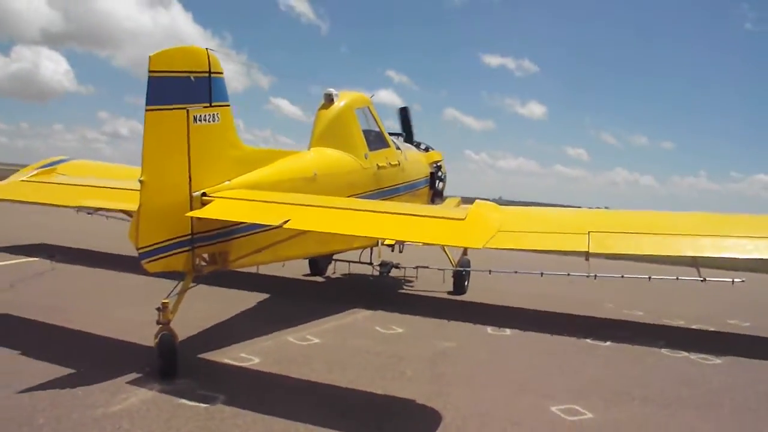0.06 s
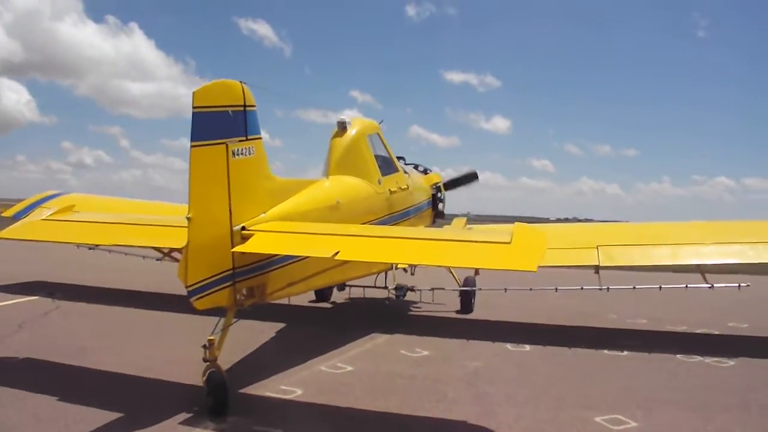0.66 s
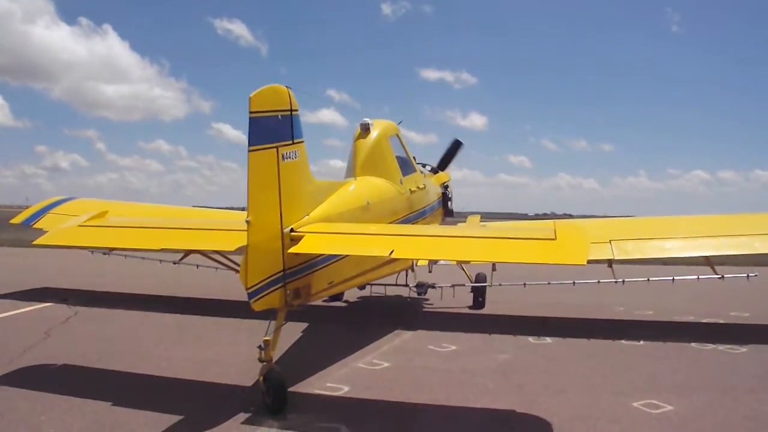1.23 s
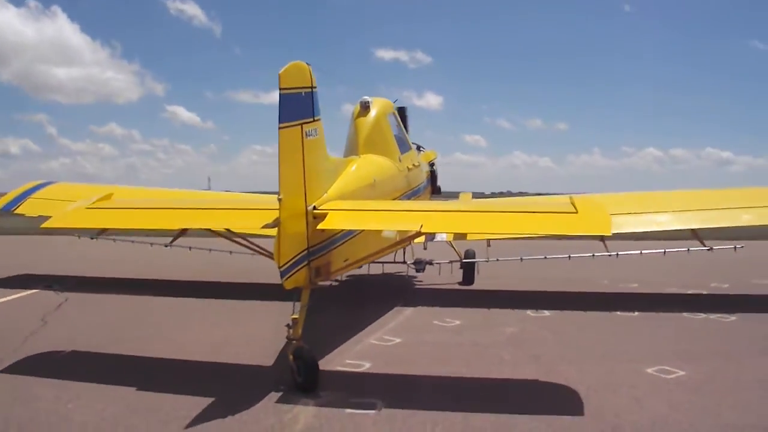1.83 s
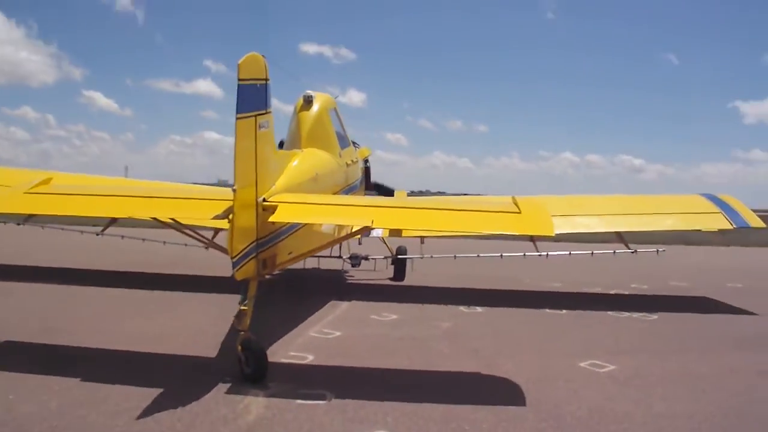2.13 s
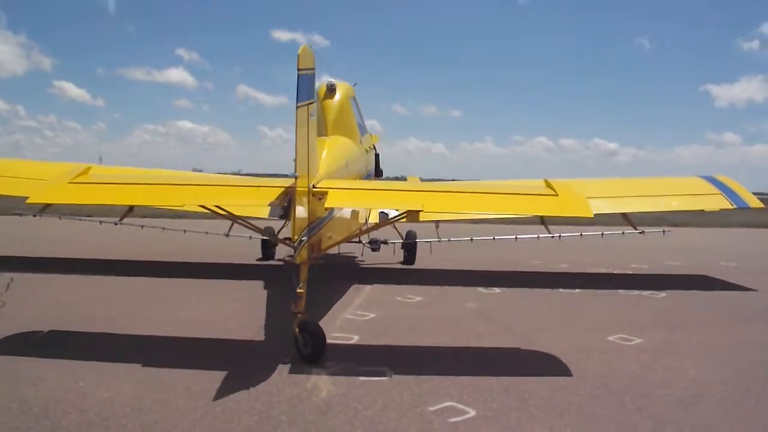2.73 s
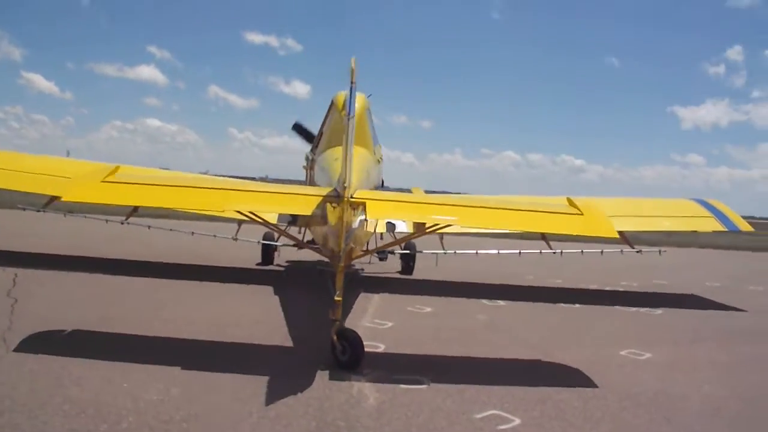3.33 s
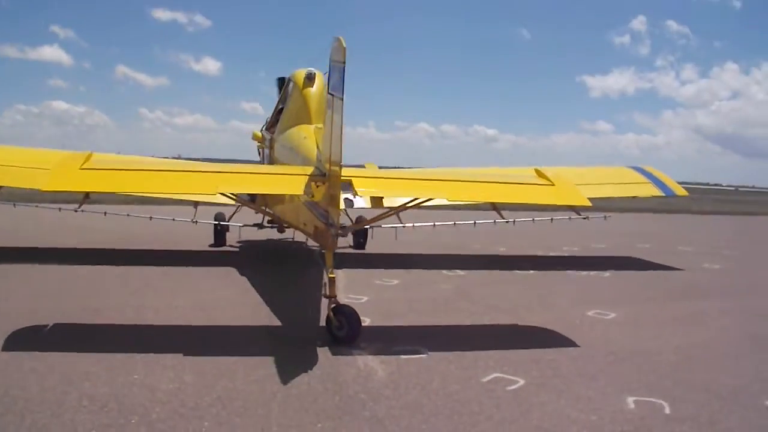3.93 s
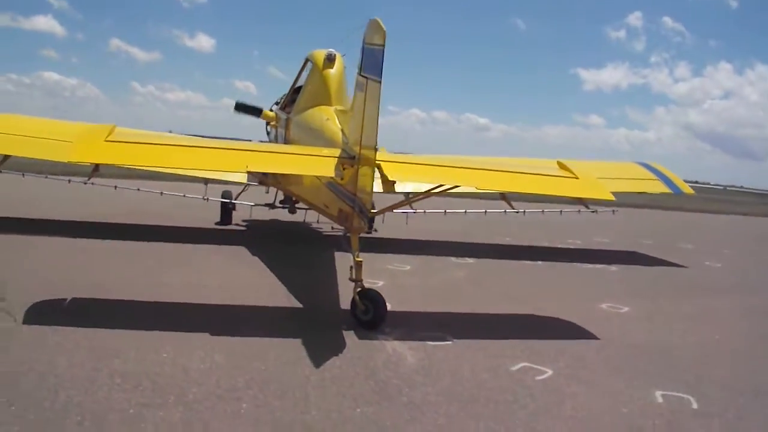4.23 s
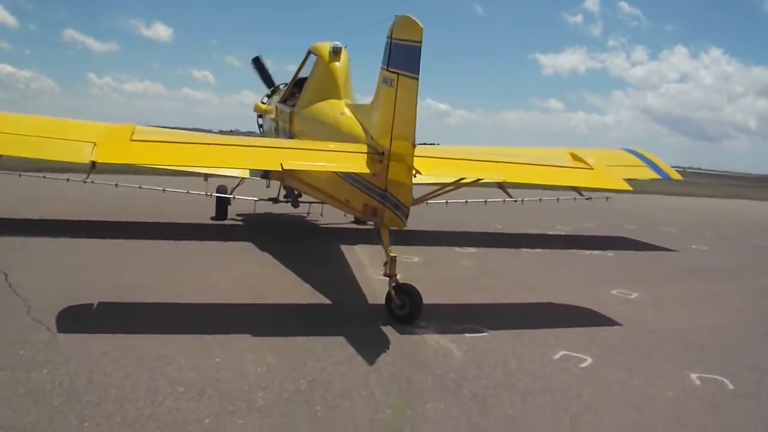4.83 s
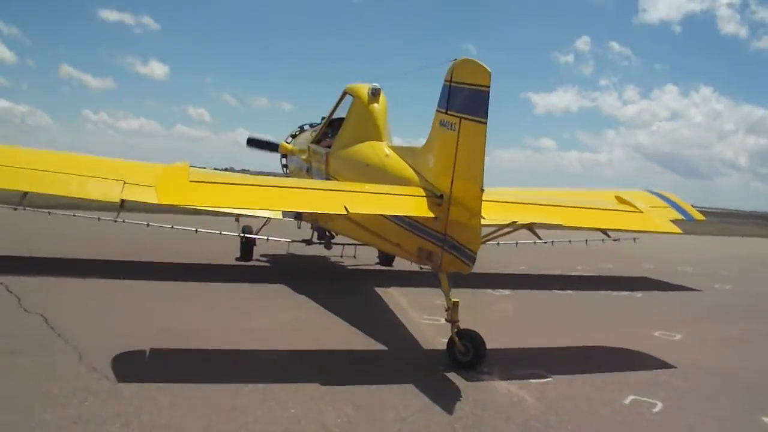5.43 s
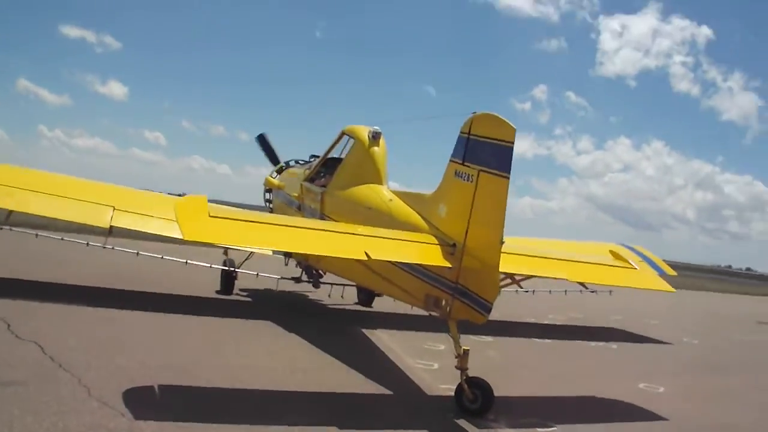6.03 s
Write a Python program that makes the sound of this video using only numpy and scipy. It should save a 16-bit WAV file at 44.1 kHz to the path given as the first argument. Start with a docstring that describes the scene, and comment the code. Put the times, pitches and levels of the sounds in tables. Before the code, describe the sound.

Gusty propeller wash buffets the microphone behind an idling piston plane, its drone and blade slap broken by two sharp wind thumps.

```python
"""A nine-cylinder radial aircraft engine idles on an open ramp, turning a two-blade propeller.
Its exhaust pulses make a drone; each passing blade slaps the air, and the blade tips hiss.
A hand-held microphone passes behind the tail, where the blades bark. The propeller's wind (its wash)
rumbles, hisses and crackles on the microphone, and two violent blasts of air overload it,
which is heard as two sharp knocks."""
import sys
import numpy as np
from scipy import signal
from scipy.fft import rfft, irfft
from scipy.io import wavfile
from scipy.ndimage import uniform_filter1d

SR = 44100
rng = np.random.default_rng(int(sys.argv[2]) if len(sys.argv) > 2 else 0)


def unload_wav(signal):
    """Save mono or channel-first audio to the path in sys.argv[1] as 16-bit WAV at rate SR, clipped to [-1, 1]."""
    wavfile.write(
        sys.argv[1],
        SR,
        np.round(np.clip(np.atleast_2d(signal).T, -1, 1) * 32767).astype(np.int16),
    )


N = 268128
TIME = np.arange(N) / SR

# Air rushing at the blade tips; the rasp and the steady hisses follow it: time_s, level_db
AIR_RUSH = [(0, -41.5), (.36, -42), (.44, -49), (.65, -44.5), (1.0, -43), (1.19, -46), (1.27, -49),
            (1.68, -55.5), (2.1, -48), (2.4, -56), (2.6, -59.5), (3.03, -53), (3.14, -46), (3.8, -46),
            (4.1, -42.5), (4.68, -52), (5.15, -41.5), (5.45, -54), (5.68, -40), (5.9, -53), (6.08, -46.5)]
# Strength of the propeller's wind on the microphone: time_s, level_db
WIND_STRENGTH = [(0, -25), (.45, -17.5), (1.0, -21.5), (1.15, -15), (1.7, -15), (1.8, -18), (2.45, -9),
                 (2.58, -23), (2.8, -17.5), (3.1, -19.5), (4.33, -29), (4.62, -17.5), (4.85, -28.5),
                 (5.3, -18), (5.55, -23.5), (5.83, -13.5), (6.08, -22.5)]


def undb(db):
    """Turn decibels into a number to multiply by."""
    return 10 ** (np.asarray(db) / 20)


def unit(x):
    """Scale a signal so that its typical swing (standard deviation) is 1."""
    return x / np.std(x)


def curve(rows):
    """Join (time_s, value) rows with straight lines, giving one value per sample."""
    return np.interp(TIME, *np.transpose(rows))


def colour(x, spectrum, size=4096):
    """Filter a sound to follow (frequency_hz, gain_db) rows."""
    hz, db = np.transpose(spectrum)
    bin_hz = np.arange(size // 2 + 1) * SR / size + 1
    log_gain = np.log(undb(np.interp(np.log(bin_hz), np.log(hz), db)))
    # folding the cepstrum makes the filter ring only after a hit, never before
    cepstrum = irfft(log_gain)[:size // 2]
    cepstrum[1:] *= 2
    ring = irfft(np.exp(rfft(cepstrum, size)))[:size // 2]
    return signal.oaconvolve(x, ring)[:N]


def noise(spectrum):
    """Noise with the given spectrum shape and a typical swing of 1."""
    return unit(colour(rng.standard_normal(N), spectrum))


def wander(rate_hz):
    """Glide to a new random value rate_hz times a second, with a typical swing of 1."""
    hold = max(int(SR / rate_hz), 2)
    steps = rng.standard_normal(N)[np.arange(N) // hold]
    return unit(uniform_filter1d(steps, hold))


def ports(x):
    """The microphone has two close openings; the left one hears a sample later."""
    return np.array([np.r_[x[0], x[:-1]], x])


def tip_hiss(offset_db=-0.5, width=0.24, grain_db=2):
    """The blade tips hiss unevenly; part of the hiss differs left and right, so it sounds wide."""
    # Tone of the hiss: frequency_hz, level_db
    spectrum = [(1500, -34), (3500, -3), (4700, 8), (5700, -4.5), (7200, -4.5), (8600, -16.5),
                (10500, -17.5), (12000, -34), (15000, -42)]
    wide_hiss = np.array([noise(spectrum), noise(spectrum)])
    level_db = curve(AIR_RUSH) + offset_db + grain_db * wander(80)
    return (ports(noise(spectrum)) + width * wide_hiss) * undb(level_db)


def crackles(boost_db=24, per_second=13, faint_db=-17, spread_db=3):
    """Wind jolts the microphone into tiny ticks; the faint ones come more often in stronger wind."""
    # The loudest jolts, before boost_db is added: time_s, level_db
    jolts = [(0.0862, -35), (0.2082, -34), (0.407, -34), (0.5285, -32.5), (0.7066, -33), (0.9592, -32),
             (1.1288, -32), (1.2177, -34), (1.3815, -35), (2.2348, -35), (3.028, -35), (3.2166, -35),
             (3.4324, -34), (4.4286, -29), (4.6555, -33), (5.2555, -30.5), (5.2908, -32.5), (5.3485, -32),
             (5.7923, -30)]
    # Tone of a tick: frequency_hz, gain_db
    spectrum = [(100, 6), (1000, 17), (3000, 10.5), (8000, -2.5), (16000, -10.5)]
    wind = undb(curve(WIND_STRENGTH)) ** 2
    at = np.flatnonzero(rng.random(N) < per_second / SR * wind / wind.mean())
    chance = rng.standard_normal((len(at), 2))
    ticks = np.zeros(N)
    ticks[at] = np.sign(chance[:, 0]) * undb(faint_db + spread_db * chance[:, 1])
    for time_s, level_db in jolts:
        ticks[int(time_s * SR)] = undb(level_db + boost_db) * rng.choice([-1, 1])
    return colour(ticks, spectrum)


def wash(flutter_db=-11, hiss_db=17.0, thump_db=4, surge_db=2.5, eddy_db=3.0,
         hiss_eddy_db=2.5, grain_db=2):
    """Big swirls of air rumble, small ones flutter, the finest hiss; gusts churn, thump and whoosh."""
    # Gusts that swell and fade: peak_s, length_s, churn_db, whoosh_db
    gusts = [(0.697, 0.037, -20, -39), (1.187, 0.031, -10, -40), (1.34, 0.036, -27, -25),
             (1.485, 0.07, -20, -26), (1.55, 0.019, -16, -33), (1.706, 0.011, -16.5, -35),
             (1.76, .03, -32, -24.5), (1.875, 0.1, -22, -28), (2.045, 0.068, -13, -26),
             (2.311, 0.089, -26, -21), (2.435, 0.034, -9.5, -17), (2.709, 0.025, -13.5, -31),
             (2.753, 0.023, -28, -26.5), (2.869, 0.034, -11, -17.5), (3.02, 0.02, -16.5, -21),
             (3.438, 0.051, -17.5, -29), (4.419, 0.027, -13.5, -41), (4.511, 0.012, -16, -37),
             (5.344, 0.051, -16.5, -49), (5.772, 0.044, -12.5, -25.5), (5.944, 0.026, -16.5, -28)]
    # Tone of each part of the wind: frequency_hz, level_db
    rumble_spectrum = [(5, -4), (14, 2), (28, -0.5), (50, -2), (80, -16.5), (130, -22), (300, -35.5),
                       (1000, -105), (8000, -130)]
    flutter_spectrum = [(30, -15.5), (100, 3), (180, -0.5), (250, -2), (400, -9), (700, -18), (1500, -34),
                        (4000, -73), (15000, -100)]
    hiss_spectrum = [(100, -5), (600, 0.5), (1000, -1.5), (1600, -4), (2200, -5.5), (2750, -2), (3250, 6),
                     (3800, -4.5), (4600, -16.5), (5700, -30.5), (7200, -42), (10500, -52), (15000, -39)]  # the microphone's opening rings near 3 kHz
    churn_spectrum = [(20, -1.5), (100, 0.5), (250, 0), (500, -8.5), (1000, -19), (2200, -29.5),
                      (3200, -20.5), (4500, -39.5), (8000, -71), (15000, -85)]
    eddies = wander(70)
    strength = undb(curve(WIND_STRENGTH))
    churning, whooshing = 0, 0
    for peak_s, length_s, churn_db, whoosh_db in gusts:
        swell = np.exp(-2 * ((TIME - peak_s) / length_s) ** 2)
        churning += swell * undb(churn_db)
        whooshing += swell * undb(whoosh_db)
    surging = strength * undb(surge_db * wander(14))
    rumble = noise(rumble_spectrum) * np.hypot(surging, churning * undb(thump_db))
    flutter = unit(noise(flutter_spectrum) * undb(eddy_db * eddies)) * strength * undb(flutter_db)
    hiss = unit(noise(hiss_spectrum) * undb(hiss_eddy_db * eddies + grain_db * wander(500)))
    hiss *= np.hypot(undb(curve(AIR_RUSH) + hiss_db), whooshing)
    return rumble + flutter + hiss + noise(churn_spectrum) * churning


def blasts(suck_s=0.006, suction=2.6, crack_s=0.002, crack_db=24, pressure=2.5, sputter_db=-1,
           edge_s=0.00046, ragged_db=4):
    """A blast sucks the microphone's diaphragm out, cracks, flings it about, then pins it, sputtering."""
    # Blasts of air: start_s, wild_s (time flung about), pinned_s (time held down), churn_db
    hits = [(2.378, .023, .021, 4), (2.772, .050, .040, 7)]
    # Tone of the churning air: frequency_hz, level_db
    spectrum = [(20, 1.5), (110, 3), (250, -5), (700, -8), (1100, -18), (2200, -25), (3200, -17.5),
                (4500, -39), (15000, -83)]
    push, churn = np.zeros(N), np.zeros(N)
    for start_s, wild_s, pinned_s, churn_db in hits:
        stages_s = start_s + np.array([-suck_s, 0, crack_s, wild_s, wild_s + pinned_s])
        suck, hit, cracked, pin, free = (SR * stages_s).astype(int)
        push[suck:hit], push[pin:free] = -suction, pressure  # the microphone's limit is about 1
        churn[hit:cracked] = undb(crack_db)
        churn[cracked:pin] = undb(churn_db)
        churn[pin:free] = undb(sputter_db)
    edge = int(edge_s * SR)
    churning = uniform_filter1d(churn, edge) * noise(spectrum) * undb(ragged_db * wander(400))
    return uniform_filter1d(push, edge) + churning


def bark(tears, level_db=-31.5, behind_s=3.81, half_crossing_s=0.55):
    """The blades bark in a narrow beam straight backwards, heard as the microphone crosses it."""
    # Tone of the bark: frequency_hz, level_db
    spectrum = [(200, -4), (520, -8), (730, 9), (950, -4), (1250, -6), (1620, 3), (1800, -4), (2000, -4),
                (2500, -12), (4000, -33), (8000, -38), (15000, -62)]
    beam = 1 / (1 + ((TIME - behind_s) / half_crossing_s) ** 6)
    return unit(colour(tears, spectrum)) * undb(level_db) * beam


def rasp(tears, boost_db=12, fade_s=0.0038, floor=0.14):
    """Torn air trails each blade as a short burst of noise over a faint steady floor."""
    # Tone of the torn air: frequency_hz, level_db
    spectrum = [(150, -17), (400, -7.5), (720, 1), (1100, -2.5), (1350, -10), (1650, -5.5), (2100, -7.5),
                (2550, -4.5), (3200, -2.5), (4500, -14), (7000, -31.5), (15000, -44)]
    trail = signal.lfilter([1], [1, -np.exp(-1 / (fade_s * SR))], tears)
    bursts = (trail + floor) * rng.standard_normal(N)
    return unit(colour(bursts, spectrum)) * undb(curve(AIR_RUSH) + boost_db)


def propeller(blade_count, scatter_db=4.0, tear_scatter_db=3.0, jitter_s=0.0001,
              echo_s=0.002, echo_gain=0.14):
    """Each blade throws a suction pulse and tears the air; the ground echoes its slap and bark."""
    # Blades that hit rough air and land harder: time_s, extra_slap_db, extra_tear_db
    hard_passes = [(.825, 9.5, 7.5), (.872, 6, 8), (.918, 0, 8.5), (.94, 6.5, 10), (3.464, 2, 10.5),
                   (3.597, 3.5, 11), (3.642, 1, 5), (3.665, 1, 6), (4.046, 4.5, 5), (4.090, 4.5, 8),
                   (4.202, 5, -1), (4.606, 4.5, 16), (4.853, 5.5, 8), (4.875, 4.5, 5), (5.010, 3, 8),
                   (5.188, 1.5, 6.5), (5.211, 6, 2), (5.591, 5, 9), (5.637, -2, 9), (5.683, -3, 7.5)]
    # Tone of a slap: frequency_hz, level_db
    slap_spectrum = [(40, 4), (130, 2), (200, 4), (330, -3.5), (460, 0.5), (600, -5.5), (780, -8),
                     (1000, -20.5), (1250, -28.5), (1700, -24), (2500, -38.5), (5000, -49.5), (15000, -79)]
    # Slap loudness as the aircraft's body hides and uncovers the propeller: time_s, level_db
    slap_levels = [(0, -31), (3.2, -29), (3.6, -20.5), (4.3, -19), (4.55, -27), (4.75, -26), (4.9, -20.5),
                   (5.2, -17.5), (5.45, -34.5), (5.65, -23), (6.08, -30)]
    passes = np.flatnonzero(np.diff(np.floor(blade_count)))
    timing, force, roughness = rng.standard_normal((len(passes), 3)).T
    at = np.clip(passes + (jitter_s * SR * timing).astype(int), 0, N - 1)
    pulses, tears = np.zeros(N), np.zeros(N)
    pulses[at] = -undb(scatter_db * force)
    tears[at] = undb(tear_scatter_db * (force + roughness) / np.sqrt(2))
    for time_s, extra_slap_db, extra_tear_db in hard_passes:
        nearest = at[np.argmin(abs(at - time_s * SR))]
        pulses[nearest], tears[nearest] = -undb(extra_slap_db), undb(extra_tear_db)
    slap = unit(colour(pulses, slap_spectrum)) * undb(curve(slap_levels))
    direct = slap - bark(tears)
    echo = echo_gain * np.interp(TIME - echo_s, TIME, direct)
    return direct + echo + rasp(tears)


def engine_drone(blade_count, waver_db=2.5, wobble_cycles=0.12):
    """Firing circles the ring of cylinders, adding tones around the firing rate; the blades hum along."""
    # Exhaust tones (multiple 9 is the firing rate): multiple_of_cycle_rate, level_db
    exhaust_tones = [(7, 0.5), (9, -7), (11, -11.5), (14, -11.5), (16, -17), (18, -16), (20, -16)]
    # Low tones of the turning blades: multiple_of_blade_rate, level_db
    blade_tones = [(1, -6), (2, -4.5), (3, -23)]
    # Loudness of both together: time_s, level_db
    drone_levels = [(0, -12), (.5, -19), (.65, -15), (1.2, -15.5), (1.5, -21.5), (2.3, -21), (3.0, -25),
                    (3.3, -18), (4.1, -17), (4.6, -23.5), (4.9, -18.5), (5.45, -20.5), (5.67, -13.5),
                    (6.08, -24)]
    cycle_count = blade_count / 4  # two blades, two turns per engine cycle
    exhaust = 0
    for multiple, level_db in exhaust_tones:
        gain = undb(level_db + waver_db * wander(11))
        exhaust += gain * np.cos(2 * np.pi * (multiple * cycle_count + wobble_cycles * wander(9)))
    hum = sum(undb(db) * np.sin(2 * np.pi * multiple * blade_count) for multiple, db in blade_tones)
    return (exhaust + hum) * undb(curve(drone_levels))


def scene():
    """Engine, propeller and wind add up at the microphone, in stereo."""
    # How often a blade passes: time_s, rate_hz
    blade_rate = [(0, 45.0), (1.1, 44.74), (2.2, 44.71), (3.0, 44.9), (3.7, 44.66), (5.1, 44.6),
                  (6.08, 44.72)]
    blade_count = np.cumsum(curve(blade_rate)) / SR - 0.2
    aircraft = engine_drone(blade_count) + propeller(blade_count)
    return ports(aircraft + wash() + blasts() + crackles()) + tip_hiss()


def record(dry, limit=1.08, sag_hz=3.6, mono_below_hz=700, top_hz=15900):
    """The microphone's input clips, blocking all sound while pinned; a held level sags toward zero."""
    pinned = np.clip(dry, -limit, limit)
    left, right = signal.lfilter(*signal.butter(1, sag_hz, "high", fs=SR), pinned)
    mid, side = (left + right) / 2, (left - right) / 2
    side -= signal.filtfilt(*signal.butter(1, mono_below_hz, fs=SR), side)  # bass becomes nearly mono
    clipped = np.clip([mid + side, mid - side], -1, 1)
    treble_cut = signal.ellip(8, 0.2, 70, top_hz, fs=SR, output="sos")
    return signal.sosfilt(treble_cut, clipped)


dry = scene()
out = record(dry)
unload_wav(out)
```